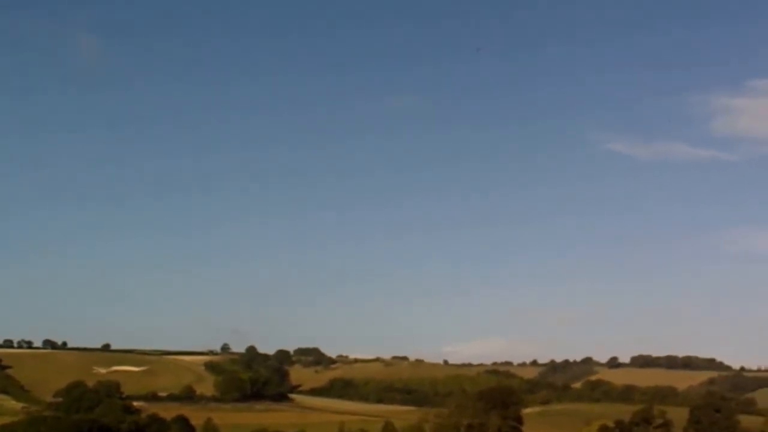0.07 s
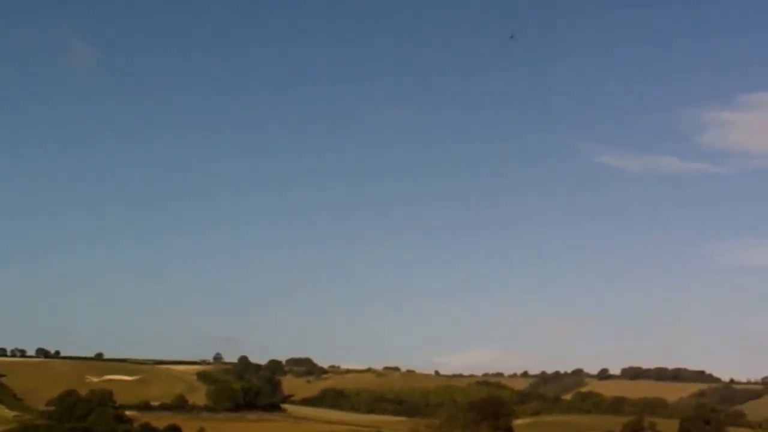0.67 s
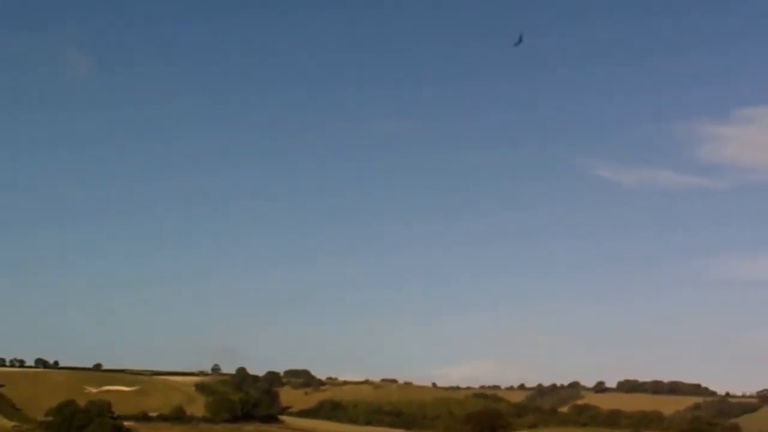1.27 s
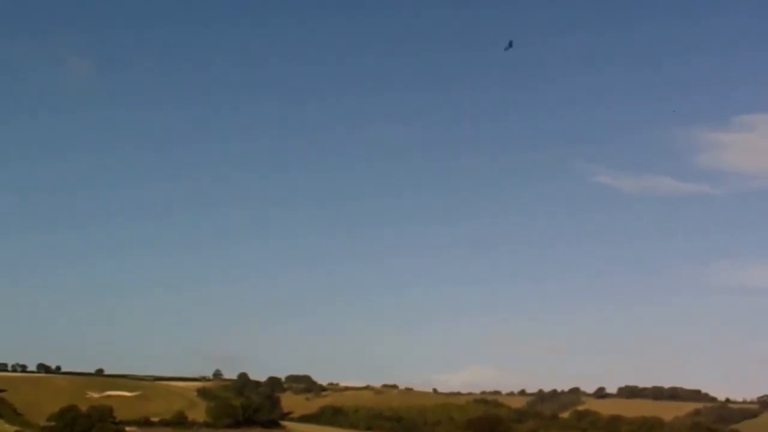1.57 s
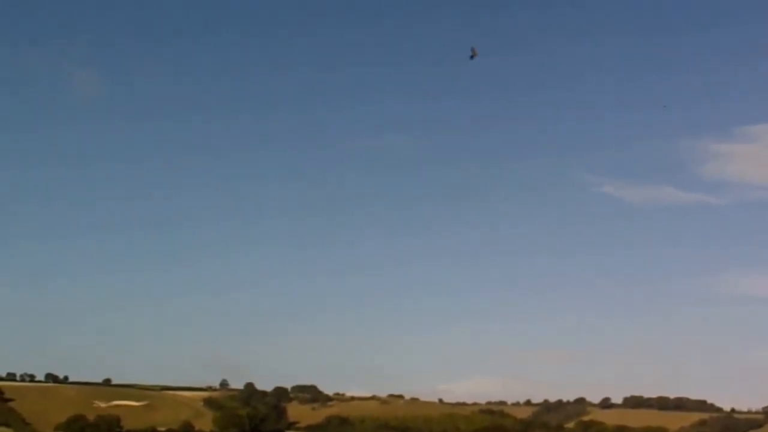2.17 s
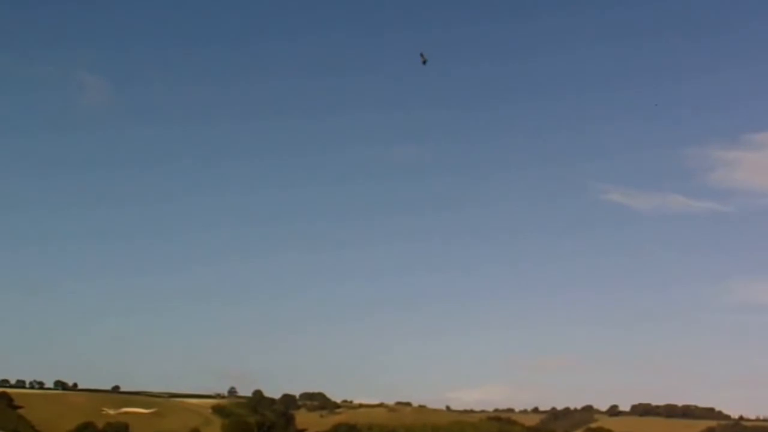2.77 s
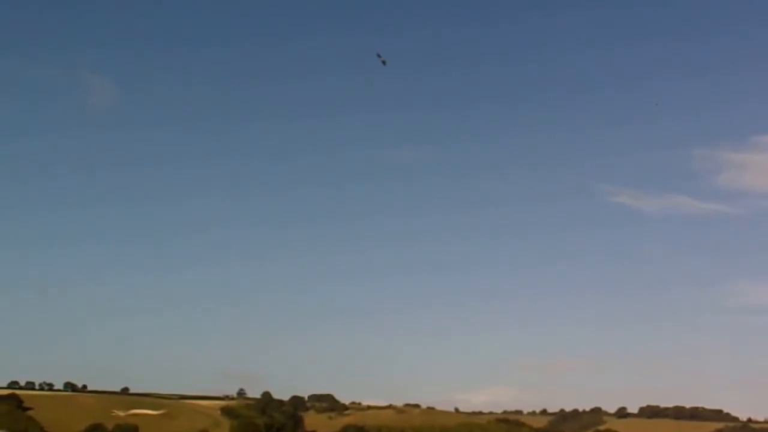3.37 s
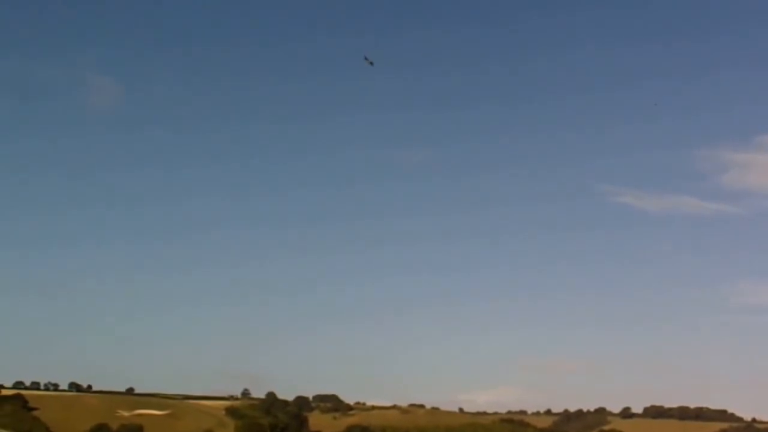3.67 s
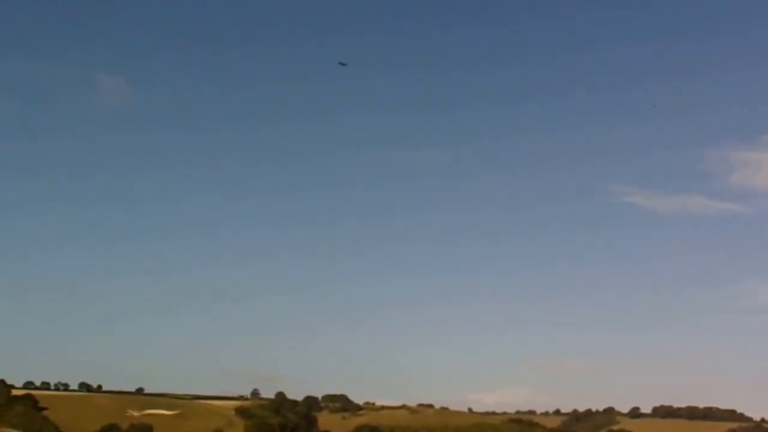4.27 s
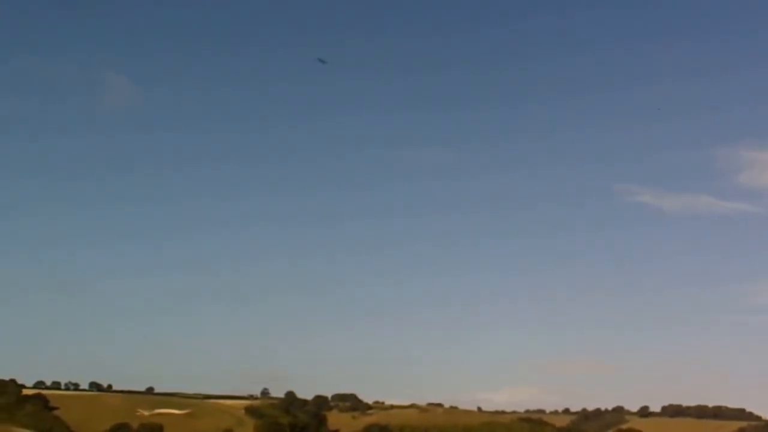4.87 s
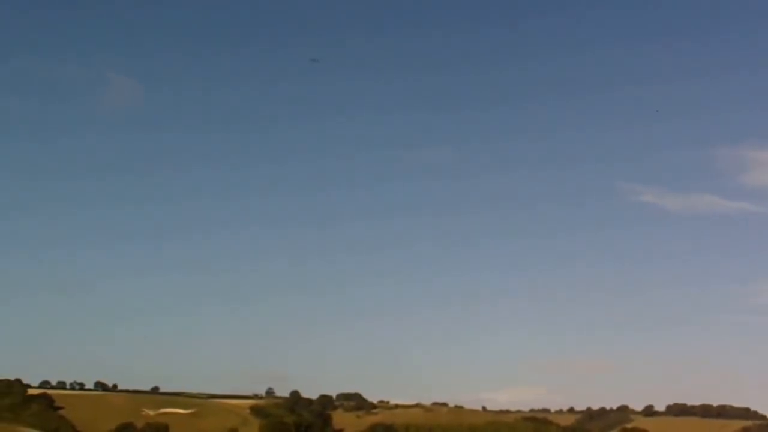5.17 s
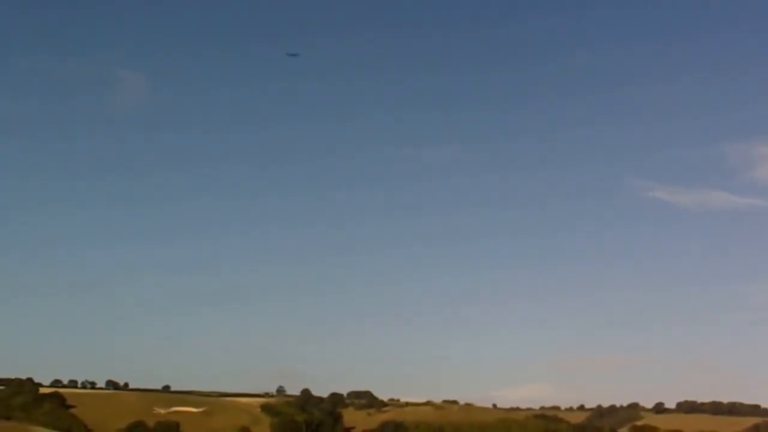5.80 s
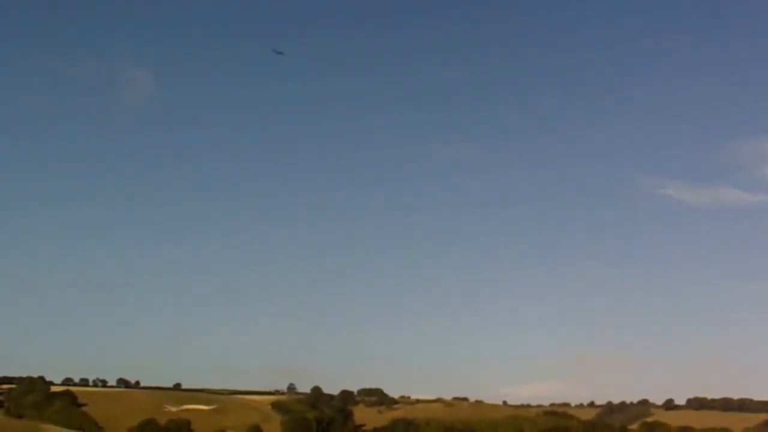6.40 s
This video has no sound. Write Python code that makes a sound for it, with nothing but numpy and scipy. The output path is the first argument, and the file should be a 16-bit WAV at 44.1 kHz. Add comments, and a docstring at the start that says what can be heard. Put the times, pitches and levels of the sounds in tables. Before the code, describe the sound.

Outdoors, under steady hiss and soft microphone bumps, small birds chip faintly and a buzzard calls once with a falling, slightly raspy mew.

```python
"""Open farmland: a buzzard soaring high above gives one long falling mew, a harmonic tone shaped by the
resonances of its throat and scattered faintly by the fields. Small birds chip in the hedges; leaves rustle.
Handling and moving air press on the single microphone of a small hand-held camera as rumble and soft bumps.
The camera adds steady hiss, a thin electronic whine and one tick of its case."""
import sys
import numpy as np
from scipy import signal
from scipy.fft import rfft, irfft, next_fast_len
from scipy.io import wavfile
from scipy.ndimage import uniform_filter1d, map_coordinates

SR = 44100
rng = np.random.default_rng(int(sys.argv[2]) if len(sys.argv) > 2 else 0)


def to_wav(sig):
    """Store sig (one row per channel, or 1-D mono) as 16-bit WAV at the path in sys.argv[1].

    Samples outside -1..1 are clipped; the rate is SR.
    """
    pcm = np.clip(np.atleast_2d(sig), -1, 1) * 32767
    pcm = np.round(pcm).astype(np.int16)
    wavfile.write(sys.argv[1], SR, pcm.T)  # frames by channels


N = 288414
TIME = np.arange(N) / SR

# Levels in the tables are relative; each source applies its own gain.
# fundamental of the mew, a quick leap and a long fall: time_s, pitch_hz
MEW_CONTOUR = [(4.764, 956), (4.788, 1348), (4.83, 1386), (4.895, 1297), (5.0, 1190), (5.1, 1109),
               (5.175, 1076), (5.251, 983), (5.355, 910), (5.5, 620)]
# harmonics of the voice before the throat, lowest first: level_db
SOURCE_HARMONICS = [-12, 0, 0, -14.5]
# resonances of the throat and open beak: frequency_hz, gain_db
THROAT_RESPONSE = [(1150, -14), (1290, 2.5), (1400, -8), (2150, -1), (2235, -0.5), (2295, 7.5),
                   (2380, -2.5), (2760, 0.5), (3000, -16), (3650, -12), (3850, -2), (4130, 2), (4500, 2),
                   (5100, -14), (5520, 5)]
# harsh moments of the voice: centre_s, half_width_s, doubling_ratio, roughness_ratio
MEW_RASPS = [(4.784, 0.019, 0.3, 0.37), (4.888, 0.031, 0.03, 0.25), (4.953, 0.015, 0.1, 0.31),
             (5.09, 0.0083, 0, 0.2), (5.136, 0.043, 0.13, 0.07), (5.238, 0.023, 0.34, 0.45),
             (5.45, 0.078, 0.4, 0.45)]
# upper harmonics revive in a last faint croak: centre_s, half_width_s, gain_db
LAST_CROAK = (5.46, 0.053, 31)
# chips of small birds: start_s, length_s, start_hz, end_hz, level_db
BIRD_CHIPS = [(.335, 0.029, 4680, 3850, -38), (.845, 0.042, 4540, 4200, -36.5),
              (1.09, 0.031, 4700, 5070, -36.5), (1.618, 0.063, 4710, 4100, -38.5),
              (3.363, .015, 4890, 3510, -32.5), (3.374, 0.016, 4760, 4700, -33),
              (3.48, .04, 4800, 4760, -37), (3.892, 0.093, 5430, 5000, -41)]
# shakes of the camera: centre_s, level_db, half_width_s
CAMERA_SHAKES = [(.08, -34.5, .06), (1.22, -30, 0.14), (1.62, -30, .055), (2.05, -33.5, 0.11),
                 (2.426, -38, .08), (2.93, -40.5, .03), (3.5, -42, .03), (3.82, -40, 0.032),
                 (4.62, -34, .08), (4.922, -22.5, .16), (5.258, -39, 0.027), (5.567, -40, .06),
                 (6.08, -32, 0.032), (6.238, -26, 0.046), (6.38, -31, 0.028), (6.53, -24, .04)]
# strongest bumps on the microphone: centre_s, level_db, nominal_width_s
MIC_BUMPS = [(1.151, -19, 0.0031), (1.18, -12.5, 0.0038), (1.261, -19, 0.0058), (1.593, -25.5, 0.0031),
             (1.638, -23.5, 0.0056), (4.617, -16.5, 0.0041), (4.782, -14, 0.0066), (4.914, -17, .002),
             (4.949, -12, 0.0051), (4.959, -12, 0.0028), (4.998, -12, 0.0027), (5.065, -11.5, 0.0018),
             (5.071, -9, .0056), (5.126, -9.5, .0024), (6.225, -19, 0.005), (6.284, -16, 0.0039),
             (6.383, -20, 0.0033), (6.511, -16, 0.0042)]
# rumble from handling and moving air: frequency_hz, density_db
RUMBLE_SPECTRUM = [(8, 2), (25, 3.5), (60, -2), (120, -17), (250, -30.5), (500, -34), (1200, -64)]
# small eddies at the microphone: frequency_hz, density_db
EDDY_SPECTRUM = [(40, 0.5), (130, 1.5), (280, -3.5), (500, -26), (1200, -31), (3000, -90)]
# modes of the camera's case: frequency_hz, level_db, t60_s
CASE_MODES = [(5300, -7.5, 0.024), (6000, 0, .008), (8800, -13, .004)]
# upward squeaks of the whine: centre_s, half_width_s
WHINE_SQUEAKS = [(2.29, 0.01), (4.396, .01), (5.777, 0.0095)]
# strength of the breeze in the leaves: time_s, level_db
BREEZE_LEVEL = [(0, -46), (.85, -47), (1.3, -46), (1.65, -47), (2.2, -48.5), (3.7, -49.5), (4.3, -51.5),
                (6.54, -57)]
# rustling leaves: frequency_hz, density_db
LEAF_SPECTRUM = [(500, -25), (1500, -3.5), (2500, -2.5), (4200, -2), (5500, -5.5), (8000, -20)]
# the camera's hiss: frequency_hz, density_db
HISS_SPECTRUM = [(30, -1), (130, -4.5), (280, -0.5), (450, -2.5), (900, -1.5), (1800, -6), (3300, -6.5),
                 (5500, -10.5), (6500, -12.5), (8000, -11), (8800, -19.5), (10000, -14.5), (13800, -16.5)]
# resonance of the microphone port: centre_hz, half_width_hz, gain_db
PORT_RESONANCE = (4564, 565, 13.03)


def buzzard(level_db=-29, ramp_s=.009, hold_s=0.42, fade_db_per_s=86, dull_db_per_s=83,
            flicker_db=0.87, waver=.0018, jitter=0.029, choke_db=13, closed_db=9, opening_s=0.018):
    """Source and filter: gliding harmonics sweep through the throat's resonances, rasping at times."""
    pitch = over_time(MEW_CONTOUR)
    age = TIME - MEW_CONTOUR[0][0]
    fading_s = np.maximum(age - hold_s, 0)
    doubling = sum(share * bell(TIME, s, half) for s, half, share, _ in MEW_RASPS)
    rough = sum(share * bell(TIME, s, half) for s, half, _, share in MEW_RASPS)
    effort_db = level_db - fade_db_per_s * fading_s - choke_db * rough
    # the voice brightens as the beak opens, dulls as it fades and turns shrill in the last croak
    croak_s, croak_half, croak_db = LAST_CROAK
    bright_db = croak_db * bell(TIME, croak_s, croak_half) - dull_db_per_s * fading_s
    bright_db -= closed_db * bell(age, 0, opening_s)
    pitch = uniform_filter1d(pitch, size=700) * (1 + waver * wobble(110) + jitter * rough * wobble(600))
    phase = 2 * np.pi * np.cumsum(pitch) / SR
    clear = np.zeros(N)
    for k, db in enumerate(SOURCE_HARMONICS, 1):
        colour_db = k * flicker_db * wobble(70) + (k > 2) * bright_db
        clear += amp(effort_db + db + along(THROAT_RESPONSE, k * pitch) + colour_db) * np.sin(k * phase)
    # period doubling puts lines halfway between the harmonics; uneven cycles add hoarseness
    rasp = clear * (doubling * np.cos(phase / 2) + .5 * rough * wobble(1400))
    voice = clear + filtered(rasp, lambda hz: amp(port_lift(hz)))
    sounding = np.clip(np.minimum(age, MEW_CONTOUR[-1][0] - TIME) / ramp_s, 0, 1)
    return np.sqrt(2) * voice * sounding


def field_scatter(call, level_db=-23, t60_s=1.0, cutoff_hz=3800):
    """Diffuse scattering from fields and hedges gives the call a dull, exponentially decaying tail."""
    tail = rng.standard_normal(SR) * amp(-60 * TIME[:SR] / t60_s)
    scattered = signal.fftconvolve(call, tail / np.linalg.norm(tail))[:N]
    return amp(level_db) * filtered(scattered, lambda hz: 1 / (1 + (hz / cutoff_hz) ** 4))


def small_birds(jitter=0.046):
    """Random frequency modulation turns short gliding tones into raspy chips."""
    chips = np.zeros(N)
    for start_s, length_s, start_hz, end_hz, db in BIRD_CHIPS:
        progress = np.clip((TIME - start_s) / length_s, 0, 1)
        pitch = (start_hz + (end_hz - start_hz) * progress) * (1 + jitter * wobble(900))
        chips += amp(db) * np.sin(np.pi * progress) * np.sin(2 * np.pi * np.cumsum(pitch) / SR)
    return chips


def handling(rumble_db=-5, calm_db=-50, bump_db=-1, lumps_db=2.5, eddy_db=-1, eddy_exponent=1.72):
    """Pressure fluctuations from handling and moving air: rumble, flutter and bumps at the microphone."""
    shake_db = shaking()
    strength = np.hypot(amp(shake_db + rumble_db), amp(calm_db))
    rumble = noise(lambda hz: along(RUMBLE_SPECTRUM, hz))
    rumble = strength * unit(rumble * amp(lumps_db * wobble(20)))
    # faster air makes smaller eddies, so the rumble brightens as it grows
    eddies = amp(eddy_exponent * shake_db + eddy_db) * noise(lambda hz: along(EDDY_SPECTRUM, hz))
    bumps = sum(amp(db + bump_db) * bump(s, width) for s, db, width in MIC_BUMPS)
    return rumble + eddies + bumps + nudges(shake_db)


def shaking():
    """Shakes add in power, each a rounded peak with long skirts; the sum is given in dB."""
    power = sum(amp(db) ** 2 / np.cosh(np.minimum(np.abs(TIME - s) / half, 20)) ** 2
                for s, db, half in CAMERA_SHAKES)
    return 10 * np.log10(power + 1e-12)


def bump(centre_s, width, core=0.54, spread=2.36, suction=0.43):
    """A pressure pulse: a short compression inside a wider, weaker rarefaction."""
    return bell(TIME, centre_s, core * width) - suction * bell(TIME, centre_s, spread * core * width)


def nudges(shake_db, level_db=-1, per_s=30, nominal_width_s=0.0048, scatter_db=1.0):
    """A Poisson process of lesser bumps, whose strength follows the shaking."""
    occurs = rng.random(N) < per_s / SR
    pushes = occurs * amp(shake_db + level_db + scatter_db * rng.standard_normal(N))
    return signal.fftconvolve(pushes, bump(TIME[N // 2], nominal_width_s), mode="same")


def case_tick(start_s=6.488, level_db=-27):
    """Damped modes of the plastic case ring once under the fingers."""
    age = np.maximum(TIME - start_s, 0)
    return sum(amp(level_db + db - 60 * age / t60) * np.sin(2 * np.pi * hz * age)
               for hz, db, t60 in CASE_MODES)


def whine(level_db=-35.5, pitch_hz=7690, frame_hz=29.294, squeak_hz=330, scatter_hz=300,
          jitter_rad=.04, flicker_db=0.57, band_hz=7400, half_band_hz=1050):
    """Periodic phase reset: an oscillator restarts with every picture, so sidebands give a fine buzz."""
    since_restart = (TIME + .002) % (1 / frame_hz)
    restart = np.maximum(np.arange(N) - np.round(since_restart * SR).astype(int), 0)
    squeak = sum(bell(TIME, s, half) for s, half in WHINE_SQUEAKS)
    extra_turns = np.cumsum(squeak * (squeak_hz + scatter_hz * wobble(900))) / SR
    turns = pitch_hz * since_restart + extra_turns - extra_turns[restart]
    tone = np.sin(2 * np.pi * turns + jitter_rad * wobble(37)) * amp(flicker_db * wobble(60))
    return amp(level_db) * filtered(tone, lambda hz: 1 / (1 + ((hz - band_hz) / half_band_hz) ** 4))


def leaves(rustle_db=3.0):
    """Amplitude-modulated noise: leaves rustle unevenly in a dying breeze."""
    strength = amp(over_time(BREEZE_LEVEL) + rustle_db * wobble(18))
    return strength * noise(lambda hz: along(LEAF_SPECTRUM, hz) + port_lift(hz))


def hiss(level_db=-41.5, drift_db=0.25):
    """The camera's broadband noise floor, coloured by the port's resonance."""
    strength = amp(level_db + drift_db * wobble(4.05))
    return strength * noise(lambda hz: along(HISS_SPECTRUM, hz) + port_lift(hz))


def port_lift(hz):
    """Resonance of the microphone port: a peak of gain, in dB."""
    centre_hz, half_width_hz, gain_db = PORT_RESONANCE
    return gain_db / (1 + ((hz - centre_hz) / half_width_hz) ** 2)


def amp(db):
    """Decibels to amplitude ratio."""
    return 10 ** (np.asarray(db) / 20)


def unit(x):
    """Normalisation to rms 1."""
    return x / np.sqrt(np.mean(x ** 2) + 1e-20)


def bell(x, centre, half_width):
    """A Gaussian of height 1."""
    return np.exp(-((x - centre) / half_width) ** 2)


def along(points, hz):
    """Interpolation on a logarithmic frequency axis."""
    frequencies, values = np.transpose(points)
    return np.interp(np.log(hz + 1), np.log(frequencies), values)


def over_time(points):
    """Linear interpolation in time, one value a sample."""
    return np.interp(TIME, *np.transpose(points))


def wobble(knots_per_s):
    """Smooth random modulation: a spline through Gaussian values."""
    knots = rng.standard_normal(int(N * knots_per_s / SR) + 4)
    return map_coordinates(knots, [TIME * knots_per_s])


def filtered(x, response):
    """Linear filtering: the spectrum is multiplied by response(hz)."""
    size = next_fast_len(N + SR // 2)
    return irfft(rfft(x, size) * response(np.fft.rfftfreq(size, 1 / SR)), size)[:N]


def noise(colour_db):
    """Spectral shaping of white noise by colour_db(hz), at rms 1."""
    return unit(filtered(rng.standard_normal(N), lambda hz: amp(colour_db(hz))))


def scene():
    """Superposition: all sources add at one microphone, which feeds both channels."""
    call = buzzard()
    mono = call + field_scatter(call) + small_birds() + handling() + case_tick()
    mono = mono + hiss() + leaves() + whine()
    return np.array([mono, mono])


def record(dry, top_hz=13950):
    """Band limiting: the camera passes nothing above top_hz."""
    return np.array([filtered(channel, lambda hz: hz < top_hz) for channel in dry])


dry = scene()
out = record(dry)
to_wav(out)
```